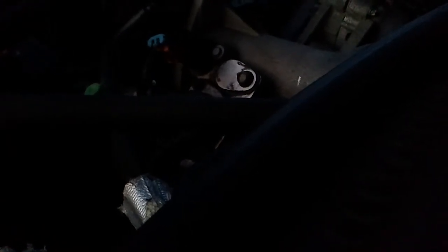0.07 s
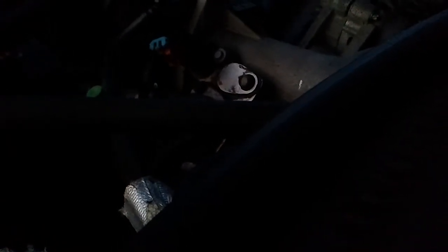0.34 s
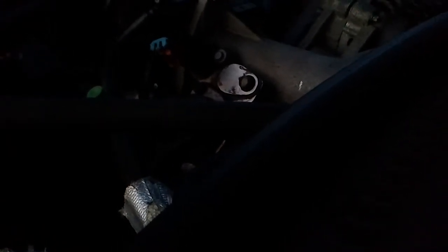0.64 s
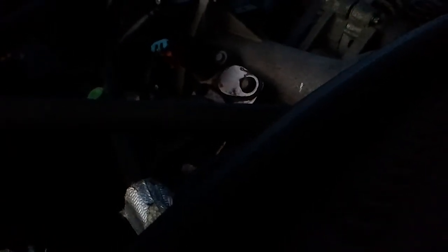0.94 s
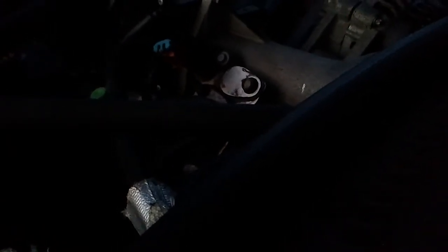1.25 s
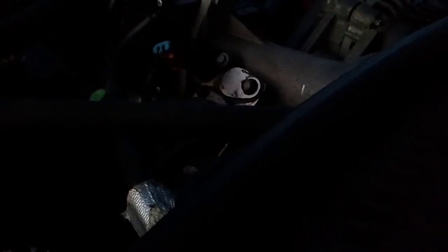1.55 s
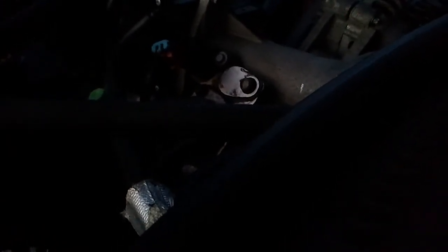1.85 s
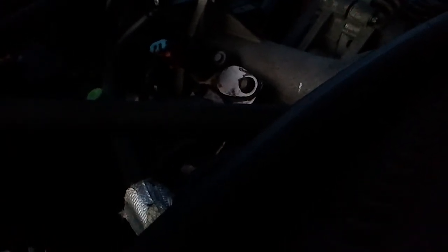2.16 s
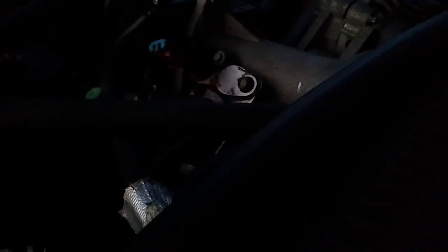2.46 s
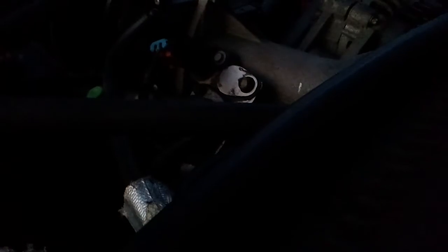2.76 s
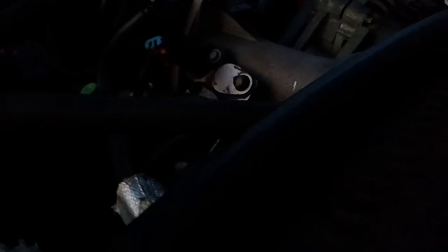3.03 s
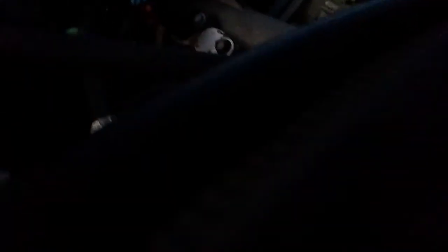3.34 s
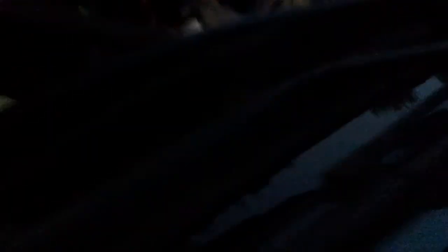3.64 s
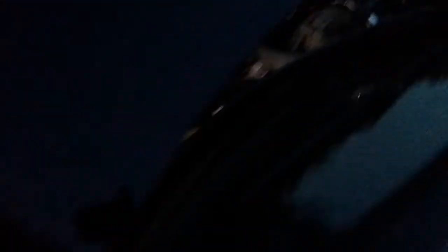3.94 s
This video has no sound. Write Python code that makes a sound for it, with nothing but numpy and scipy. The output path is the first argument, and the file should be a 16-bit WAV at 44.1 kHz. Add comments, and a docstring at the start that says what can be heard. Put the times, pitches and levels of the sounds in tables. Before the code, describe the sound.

A car engine runs close up in an open bay, dropping from a rev with a boom, falling whines and low knocks during the first second. A hoarse rubbing squawk with a metallic ring and rasp repeats throughout, slowing and softening to about six a second by 1.5 seconds. Rumble, valve clatter and scattered dull thuds continue underneath, with faint clinks around 1.5, 2 and 3.5 seconds.

```python
"""At an open engine bay, microphone close in, as a four-cylinder car engine drops from a rev to idle. Once in
every cycle something rubs: a hoarse squawk with a metallic ring that ends in a rasp. Under it the firing
drones, the valves clatter, the block knocks as it slows, and dull thuds come and go. Accessory whines, hollow
panel tones and a few clinks sit further back."""
import sys
import numpy as np
from scipy import signal
from scipy.fft import rfft, irfft
from scipy.io import wavfile

SR = 44100
rng = np.random.default_rng(int(sys.argv[2]) if len(sys.argv) > 2 else 0)


def file_out(sig):
    """Save sig as 16-bit WAV at sys.argv[1]."""
    # one column per channel
    cols = np.atleast_2d(sig).T
    # limit, then scale
    lim = np.clip(cols, -1, 1)
    pcm = np.round(lim * 32767).astype(np.int16)
    wavfile.write(sys.argv[1], SR, pcm)


N = 176400
T = np.arange(N) / SR

# One rub per engine cycle. Each row: centre in seconds, squawk in dB, its pitch in Hz, ring in dB.
RUBS = [(0.055, -34, 1470, -26.5), (0.158, -21.5, 1418, -20), (0.268, -24.5, 1410, -21.5),
        (0.391, -24.5, 1380, -22), (0.522, -23, 1370, -26), (0.657, -30, 1309, -28),
        (0.8, -30.5, 1262, -32), (0.952, -35.5, 1282, -34), (1.11, -32, 1089, -34), (1.275, -34, 1060, -36),
        (1.445, -33, 1210, -33), (1.626, -33.5, 1300, -33.5), (1.821, -32, 1358, -35.5),
        (2.008, -30.5, 1352, -34.5), (2.19, -31.5, 1351, -31.5), (2.372, -30.5, 1379, -33.5),
        (2.55, -32, 1362, -34.5), (2.725, -30.5, 1370, -34.5), (2.899, -29.5, 1377, -37),
        (3.078, -29.5, 1350, -37), (3.251, -31.5, 1365, -32.5), (3.422, -32, 1340, -35.5),
        (3.586, -30.5, 1327, -38), (3.743, -30.5, 1370, -42), (3.897, -33.5, 1427, -44)]


def amp(db):
    """Decibels to gain."""
    return 10 ** (np.asarray(db) / 20)


def unit(x):
    """Scales to rms 1."""
    return x / np.sqrt(np.mean(x ** 2) + 1e-20)


def noise():
    """White noise at rms 1."""
    return rng.standard_normal(N)


def curve(table, column):
    """One column of a table, joined by straight lines in time."""
    rows = np.array(table)
    return np.interp(T, rows[:, 0], rows[:, column])


def colour(x, spectrum):
    """Gives x a spectrum, at rms 1."""
    hz, db = np.transpose(spectrum)
    gain = amp(np.interp(np.log(np.fft.rfftfreq(N, 1 / SR) + 1), np.log(hz), db))
    return unit(irfft(rfft(x) * gain, N))


def wander(rate_hz):
    """Smooth random drift at rms 1."""
    lowpass = np.exp(-(np.fft.rfftfreq(N, 1 / SR) / rate_hz) ** 2)
    return unit(irfft(rfft(noise()) * lowpass, N))


def resonate(x, hz, width_hz, order=2):
    """A fixed or moving resonance, at rms 1."""
    carrier = np.exp(2j * np.pi * np.cumsum(hz * np.ones(N)) / SR)
    pole = np.exp(-np.pi * width_hz / SR)
    baseband = x / carrier
    for _ in range(order):
        baseband = signal.lfilter([1 - pole], [1, -pole], baseband + 1e-18)
    return unit((baseband * carrier).real)


def grit(rough_db, rate_hz):
    """Friction noise whose strength flutters quickly."""
    return unit(noise() * amp(rough_db * wander(rate_hz)))


def tone(hz, db, waver, flutter_db):
    """A slightly unsteady sine."""
    phase = 2 * np.pi * np.cumsum(hz * (1 + waver * wander(25.03))) / SR
    return np.sqrt(2) * np.sin(phase) * amp(db + flutter_db * wander(20))


def contact(place, half, edge):
    """A rounded plateau reaching half to each side of place 0."""
    return 1 / (1 + np.exp(np.clip((abs(place) - half) / edge, -50, 50)))


def cycles():
    """Engine cycles elapsed; a whole number at the centre of each rub."""
    centres = np.array(RUBS)[:, 0]
    centres = np.r_[2 * centres[0] - centres[1], centres, 2 * centres[-1] - centres[-2]]
    return np.interp(T, centres, np.arange(len(centres)) - 1)


def beats(turn, pattern_db, scatter_db):
    """Clicks whose pattern of strengths repeats once a cycle."""
    count = len(pattern_db)
    step = np.floor(turn * count).astype(int)
    at = np.flatnonzero(np.diff(step)) + 1
    out = np.zeros(N)
    out[at] = amp(np.array(pattern_db)[step[at] % count] - scatter_db * rng.standard_normal(len(at)))
    return out


def squawk(place, pitch, level_db, bend=1.4, judder=0.097):
    """The rubbing part grips and judders: hoarse noise and a rough tone on one gliding pitch."""
    # Pitch slope through a rub. Each row: time in seconds, share of the pitch per cycle.
    glide = [(0, -.2), (.6, -.2), (1.1, -0.58), (1.45, -.9), (1.8, -.1), (2.3, 0.16), (4, 0.062)]
    # Length of the grip. Each row: time in seconds, half length in cycles.
    grip = [(0, 0.25), (.55, 0.087), (1.1, 0.16), (1.8, 0.14), (4, 0.18)]
    hz = pitch * (1 + curve(glide, 1) * place + bend * np.minimum(abs(place), .2) ** 2)
    hoarse = resonate(grit(rough_db=0, rate_hz=180), hz, 300, order=3)
    voiced = tone(hz, 0, waver=0.017, flutter_db=0) * unit(amp(2 * wander(200)))
    envelope = amp(level_db) * contact(place - .015, curve(grip, 1), edge=.024)
    shake = 1 + judder * np.cos(2 * np.pi * 10 * (place - .025))
    return (amp(-1.8) * hoarse + amp(-3.5) * voiced) * envelope * shake


def scraping(place, level_db):
    """Friction noise around the squawk: a hollow throat and brief shrill scrapes."""
    # The hollow band. Each row: time in seconds, dB relative to the rub.
    throat = [(0, -8.5), (.55, -9), (.8, -4.5), (1.1, 0), (1.3, 3.5), (1.5, -1), (1.9, -9.5), (4, -21)]
    # Each row is a scrape: centre and half length in cycles, pitch and width in Hz, relative dB.
    scrapes = [(-0.16, 0.044, 1830, 300, -6), (-.16, 0.032, 6070, 720, -10),
               (-.16, 0.079, 5400, 700, -11.5), (.115, 0.036, 5170, 440, -8.5),
               (.12, 0.081, 6200, 900, -14.5), (0.012, 0.11, 1667, 300, -9.5), (.1, .13, 2900, 1100, -16.5),
               (0.23, 0.036, 6800, 4200, -11)]
    out = resonate(grit(rough_db=1, rate_hz=200), 943, 630, order=3)
    out *= amp(level_db + curve(throat, 1)) * contact(place - .01, 0.16, edge=.05)
    for centre, half, hz, width, db in scrapes:
        band = resonate(grit(rough_db=1.5, rate_hz=350), hz, width)
        out += band * amp(np.minimum(level_db, -24) + db) * contact(place - centre, half, edge=.014)
    return out


def metal_ring(place, level_db, damping=0.17):
    """Friction rings the rubbed metal; towards idle the squawk briefly damps it."""
    # Modes of the metal. Each row: pitch in Hz, width in Hz, relative level in dB.
    modes = [(3586, 97, -1.5), (3057, 120, -10), (3253, 240, -10), (3950, 240, -7), (2470, 130, -14)]
    drive = grit(rough_db=4.5, rate_hz=380)
    ring = sum(amp(db) * resonate(drive, hz, width) for hz, width, db in modes)
    ring *= 1 - damping * np.clip(T - 1, 0, 1) * contact(place + 0.041, 0.036, edge=0.021)
    centre = np.interp(T, [.5, 1.7], [-.06, .005])
    half = np.interp(T, [.4, 1.7], [.11, .22])
    return ring * amp(level_db) * contact(place - centre, half, edge=0.041)


def rubs(turn):
    """Once a cycle a part rubs: it squawks, scrapes and rings."""
    nearest = np.clip(np.round(turn).astype(int), 0, len(RUBS) - 1)
    place = turn - nearest  # cycles from the rub's centre
    _, level_db, pitch, ring_db = np.array(RUBS)[nearest].T
    return squawk(place, pitch, level_db) + scraping(place, level_db) + metal_ring(place, ring_db - 1)


def rasps(half_s=0.0058, edge_s=0.0045):
    """Dry gritty bursts, mostly as the rub lets go, that also touch the main ring."""
    # Each row is a burst: centre in seconds, level in dB.
    bursts = [(0.015, -19), (0.105, -22.5), (0.231, -21.5), (0.426, -30), (0.448, -19.5), (0.474, -23),
              (0.555, -21.5), (0.572, -20), (0.695, -25.5), (0.841, -27.5), (0.982, -24), (1.134, -37),
              (1.305, -54), (1.482, -22), (1.665, -28), (1.847, -28), (2.033, -42), (2.228, -24),
              (2.41, -26.5), (2.581, -26), (2.76, -24.5), (2.931, -28), (3.11, -29.5), (3.282, -33),
              (3.452, -29), (3.608, -41), (3.767, -40), (3.93, -39)]
    # Their spectrum. Each row: frequency in Hz, relative dB.
    spectrum = [(600, -10), (1500, 2), (2100, -6), (3000, 2.5), (3700, 1), (4500, -4), (5300, -1),
                (7200, -3), (8500, -10)]
    envelope = sum(amp(db) * contact(T - s, half_s, edge_s) for s, db in bursts)
    drive = grit(rough_db=-1.5, rate_hz=550)
    return envelope * (amp(-1) * colour(drive, spectrum) + amp(-5.5) * resonate(drive, 3546, 310))


def firing(turn, hum_order=15):
    """Each firing rings the bay's low resonance, with a hum on one engine order and an uneven rumble."""
    # Strength of each of the four cylinders in dB.
    cylinder_db = [-0.77, 1.3, 2.4, -3.8]
    # The low end. Each row: time in seconds, drone in dB, rumble in dB.
    low_end = [(0, -31, -18), (.35, -23, -22.5), (.47, -45, -26), (.7, -35, -26.5), (1.25, -27.5, -26),
               (1.5, -35, -29.5), (2, -33, -31.5), (2.2, -26.5, -26), (2.6, -36, -32), (2.95, -36, -29.5),
               (3.25, -29, -27.5), (3.5, -31, -32), (4, -23.5, -36)]
    # The rumble's spectrum. Each row: frequency in Hz, relative dB.
    spectrum = [(12, -34.5), (24, -18.5), (34, -2.5), (44, -1), (62, -2.5), (100, -0.5), (180, -31),
                (400, -42.5)]
    throb = resonate(beats(turn + 0.063, cylinder_db, scatter_db=0.5), 89.5, 26)
    flutter = resonate(noise(), 95.5, 45)
    hum = np.sqrt(2) * np.sin(2 * np.pi * hum_order * turn + .5 * wander(9.1)) * np.clip(T - 1, 0, 1)
    drone = amp(-3) * throb + amp(-7) * flutter + amp(-5) * hum
    return drone * amp(curve(low_end, 1)) + colour(noise(), spectrum) * amp(curve(low_end, 2))


def clatter(turn, tick_s=0.018, tick_db=-4):
    """Valve ticks pulse a steady wash, in the dull body of the engine and in its treble."""
    # The wash. Each row: time in seconds, body and hiss in relative dB.
    wash = [(0.0, -30, -31.5), (0.33, -33.5, -33), (0.58, -36.5, -38.5), (0.92, -38.5, -36.5),
            (1.18, -39.5, -39), (2.15, -41, -39), (3.23, -38.5, -39), (3.63, -39.5, -38),
            (4.0, -42.5, -42.5)]
    # Spectra of body and hiss. Each row: frequency in Hz, relative dB.
    body_spectrum = [(110, 4.5), (160, 5), (215, 3.5), (300, 3.5), (400, 0), (620, -1), (900, -3.5),
                     (1080, -10), (1300, -12), (2000, -10.5), (3000, -30)]
    hiss_spectrum = [(500, -42.5), (1200, 8.5), (2100, 2), (2800, 5.5), (3600, 4), (4500, 2), (5400, 3),
                     (7200, 5), (8400, -9.5)]
    clicks = beats(turn + .03, [1, -3, -1, -7.5, -15.5, -11.5, -2.5, 4.5], scatter_db=0.5)
    ticks = unit(signal.lfilter([1], [1, -np.exp(-1 / (tick_s * SR))], clicks))
    pulsing = np.hypot(1, amp(tick_db) * ticks)
    body = colour(grit(rough_db=1, rate_hz=300) * pulsing, body_spectrum)
    hiss = colour(grit(rough_db=2.5, rate_hz=150) * pulsing, hiss_spectrum)
    return body * amp(curve(wash, 1) + 3) + hiss * amp(curve(wash, 2) + 2)


def knocks(hz=88, sub_hz=46, decay_s=.025):
    """The slowing block shudders and rings low."""
    # Each row is a knock: start in seconds, level in dB.
    blows = [(0.266, -12.5), (0.357, -9), (0.512, -12.5), (0.649, -11), (.792, -14), (0.942, -12),
             (1.099, -11), (2.155, -45)]
    out = np.zeros(N)
    for start, db in blows:
        age = np.maximum(T - start, 0)
        ring = np.sin(2 * np.pi * hz * age) + amp(-8) * np.sin(2 * np.pi * sub_hz * age)
        out += amp(db) * np.exp(-age / decay_s) * ring
    return out


def thuds(decay_periods=0.45):
    """Soft pushes of air, about one swing long."""
    # Each row is a thud: centre in seconds, level in dB, pitch in Hz.
    pushes = [(0.199, -16.5, 165), (0.231, -22, 202), (0.695, -19, 177), (0.889, -18.5, 151),
              (1.349, -24, 190), (1.711, -16.5, 170), (1.763, -18, 110), (1.798, -32, 164),
              (1.812, -14.5, 140), (2.021, -16, 220), (2.11, -26, 108.8), (2.156, -9, 110),
              (2.285, -14.5, 140), (2.304, -15, 250), (2.332, -8.5, 70), (2.542, -16.5, 74.7),
              (3.005, -15.5, 200), (3.012, -18.5, 160), (3.157, -42, 100), (3.213, -14.5, 130),
              (3.262, -19, 60), (3.312, -14, 110), (3.861, -19, 90), (3.942, -21, 190)]
    out = np.zeros(N)
    for centre, db, hz in pushes:
        near = abs(T - centre) < .05
        periods = (T[near] - centre) * hz
        out[near] += amp(db) * np.exp(-abs(periods) / decay_periods) * np.cos(2 * np.pi * periods)
    return out


def whines():
    """The rev's exhaust boom and two accessory whines fall and end; faint tones come in at idle."""
    # The boom and the whines. Each row: time in seconds, pitch in Hz, level in dB.
    boom = [(0, 113.4, -18.5), (.05, 109.9, -17.5), (.16, 92.9, -12), (.22, 95.3, -23.5), (.31, 88.4, -26),
            (.45, 79, -54)]
    low_whine = [(.18, 1110, -43), (0.229, 1050, -36.5), (.29, 997, -31), (.34, 993, -39)]
    high_whine = [(0.168, 1925, -36), (.23, 1847, -35), (0.341, 1663, -40), (.48, 1523, -53),
                  (.65, 1386, -42)]
    # Each row is an idle tone: pitch in Hz, relative level in dB.
    idle_tones = [(446.8, -59.5), (576.0, -65), (672.9, -59)]
    rev = np.zeros(N)
    for track in (boom, low_whine, high_whine):
        sounding = (T >= track[0][0]) & (T < track[-1][0])
        rev += tone(curve(track, 1), curve(track, 2), waver=0.0055, flutter_db=1.5) * sounding
    idle = sum(tone(hz, db + 1.5, waver=0.00502, flutter_db=6.5) for hz, db in idle_tones)
    return rev + idle * np.clip(T - 1, 0, 1)


def hollow(turn, swell_db=4):
    """Hollow panel tones swell after each rub; they and a low hum fade as the engine settles."""
    # The bay's resonances. Each row: time in seconds, panel in dB, hum in dB.
    levels = [(0, -44.5, -31.5), (.25, -34.5, -30.5), (.55, -42, -42.5), (.9, -41, -42), (1.2, -50.5, -42),
              (1.47, -44.5, -46.5), (1.9, -57.5, -49), (4, -64.5, -50)]
    panel = resonate(noise(), 449.5, 40, order=3) + resonate(noise(), 495, 45)
    panel += amp(-4) * resonate(noise(), 611, 82)
    swell = amp(curve(levels, 1) + swell_db * np.cos(2 * np.pi * (turn - .3)))
    return panel * swell + resonate(noise(), 220.6, 40) * amp(curve(levels, 2))


def fuzzy_whine():
    """An accessory whistles softly throughout, in a narrow band of noise."""
    # The whistle. Each row: time in seconds, pitch in Hz, level in dB.
    track = [(1.3, 1000, -41.5), (1.7, 1057, -43.5), (2.3, 1012, -43.5), (2.8, 1064, -44.5),
             (3.15, 1056, -43), (3.5, 1025, -50.5), (4, 1020, -48.5)]
    return resonate(noise(), curve(track, 1), width_hz=130) * amp(curve(track, 2))


def clinks(decay_s=0.0035):
    """Loose metal ticks, each a brief bright ring."""
    # Each row is a clink: start in seconds, level in dB, pitch in Hz.
    hits = [(1.476, -32, 5370), (1.977, -30, 5650), (2.029, -28, 5714), (3.436, -27.5, 4996),
            (3.599, -24, 4950), (3.718, -33, 6430), (3.759, -26, 5050)]
    out = np.zeros(N)
    for start, db, hz in hits:
        envelope = amp(db) * (T > start) * np.exp(-abs(T - start) / decay_s)
        out += envelope * resonate(noise(), hz, width_hz=500)
    return out


def bay(x, t60_s=0.057, wet_db=-7):
    """Close metal walls add short, dense reflections."""
    t = T[:4096]
    tail = rng.standard_normal(len(t)) * amp(-60 * t / t60_s) * (t > .002)
    reflections = signal.oaconvolve(x, tail / np.linalg.norm(tail))[:N]
    return (x + amp(wet_db) * reflections) / np.hypot(1, amp(wet_db))


def scene():
    """The engine from one close spot; rubs, firing, valves and panel swell share its cycle."""
    turn = cycles()
    low = firing(turn) + knocks() + bay(thuds(), t60_s=0.15, wet_db=-8)
    machinery = bay(clatter(turn) + clinks()) + hollow(turn) + whines() + fuzzy_whine()
    return (low + machinery + rubs(turn) + rasps())[None]


def record(dry, cutoff_hz=8560, dc_offset=-.087):
    """The recorder cuts the top treble and adds a constant offset."""
    lowpass = signal.firwin(301, cutoff_hz, window=("kaiser", 9), fs=SR)
    return signal.oaconvolve(dry, lowpass[None], "same") + dc_offset


dry = scene()
out = record(dry)
file_out(out)
```